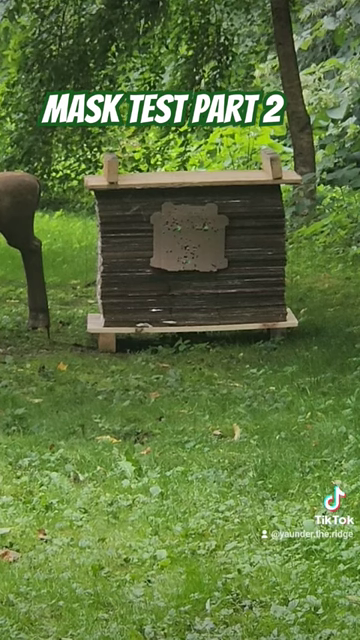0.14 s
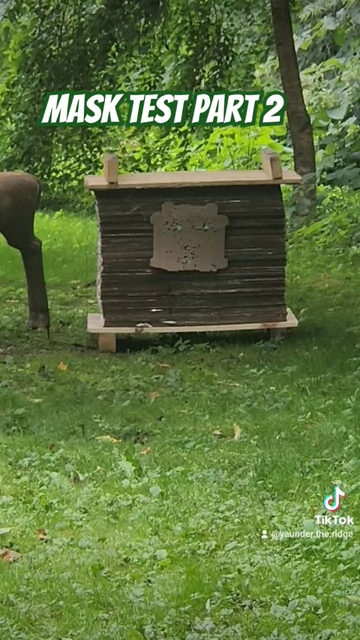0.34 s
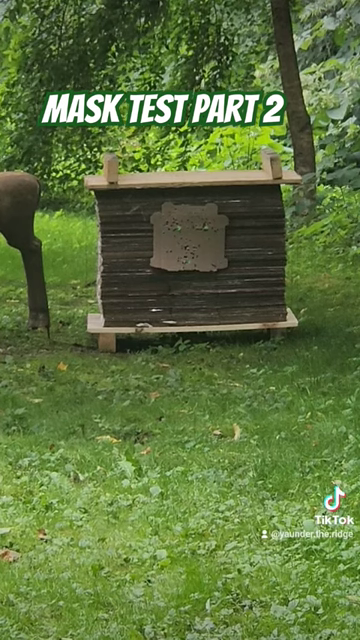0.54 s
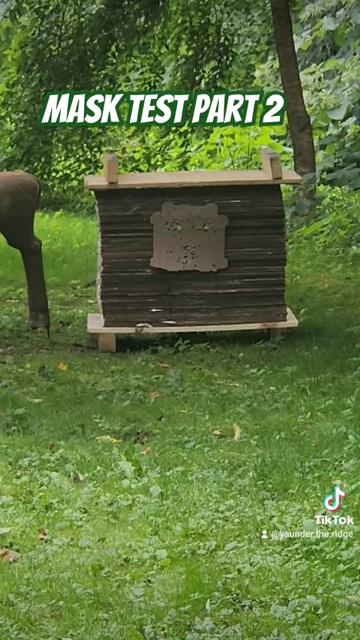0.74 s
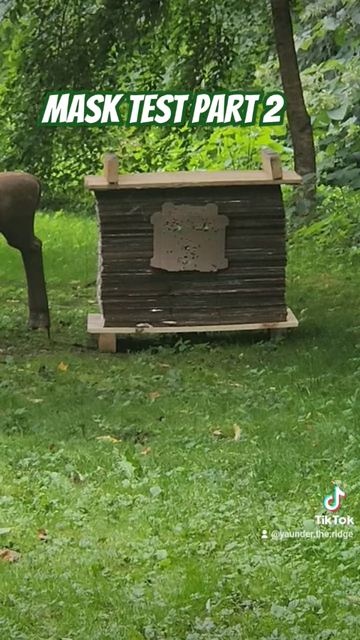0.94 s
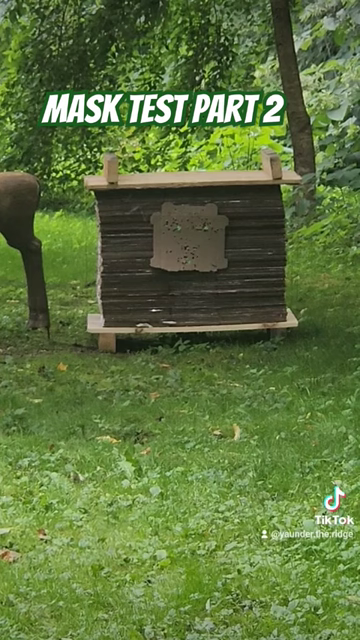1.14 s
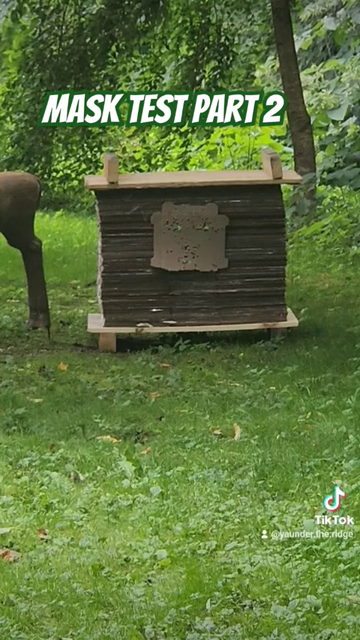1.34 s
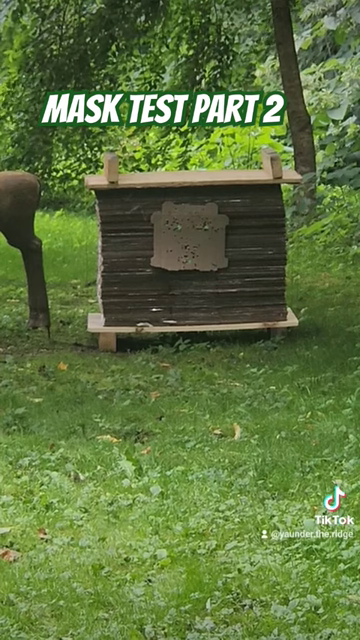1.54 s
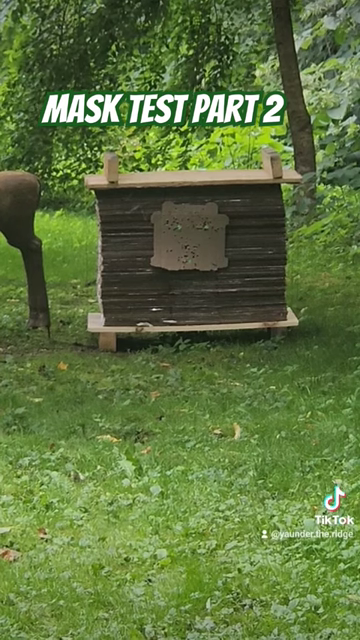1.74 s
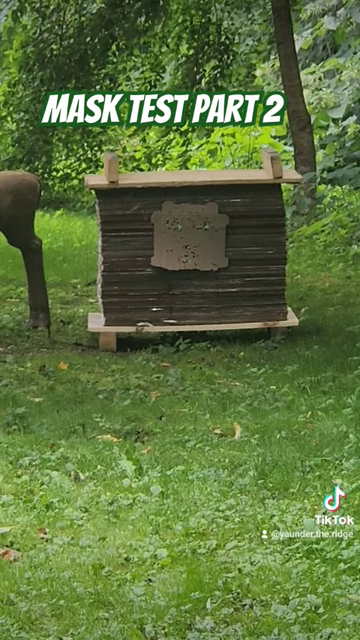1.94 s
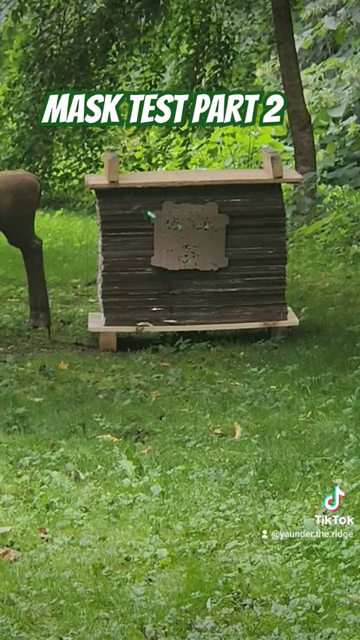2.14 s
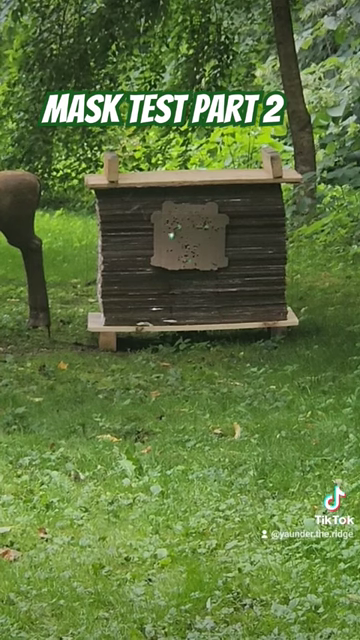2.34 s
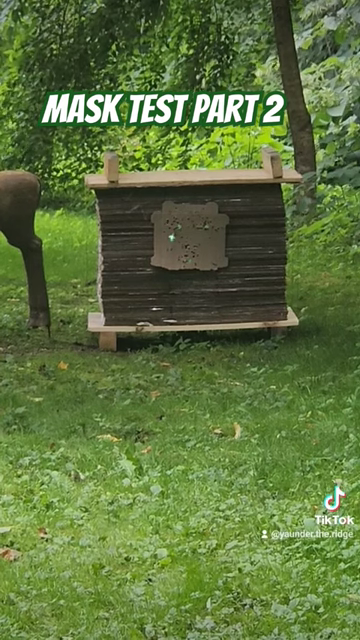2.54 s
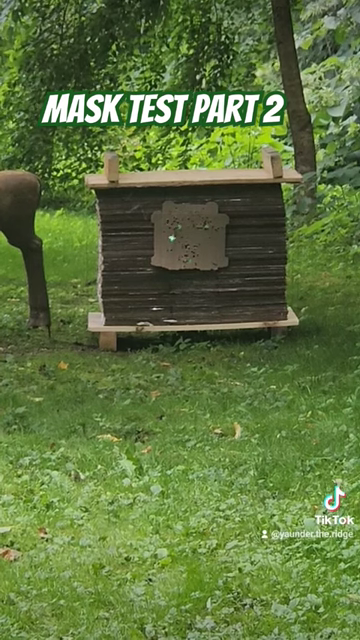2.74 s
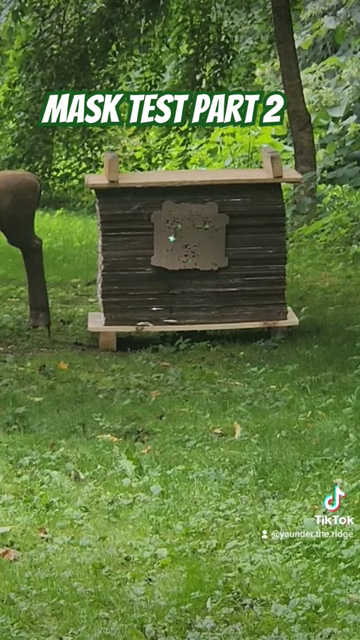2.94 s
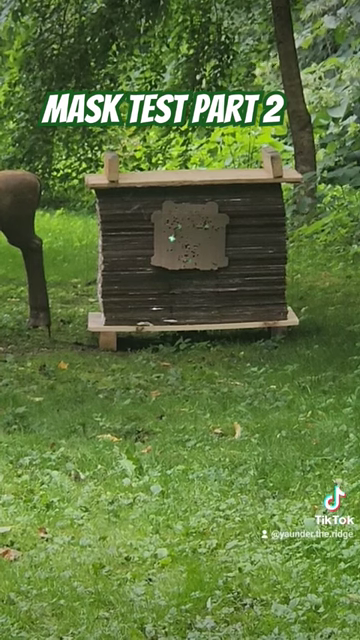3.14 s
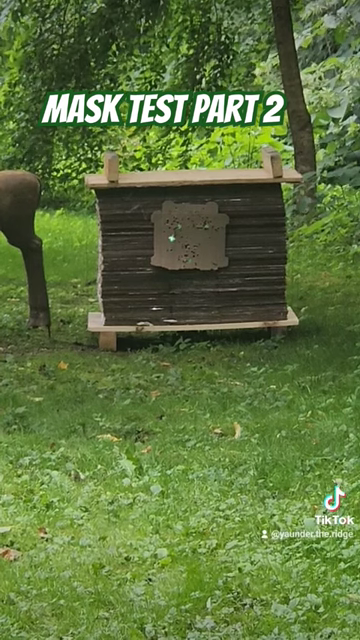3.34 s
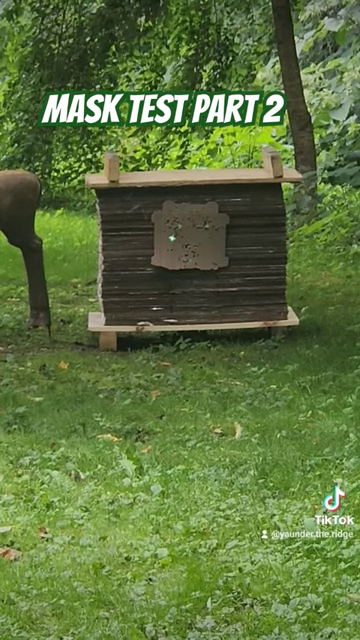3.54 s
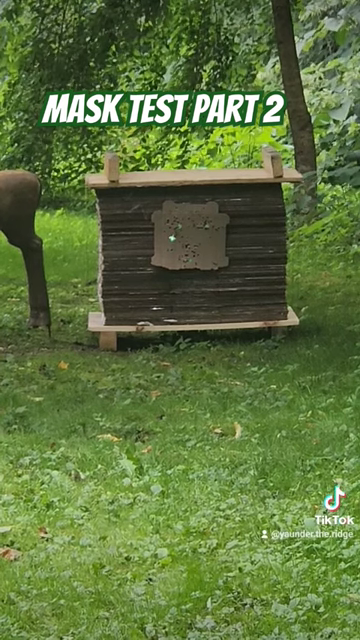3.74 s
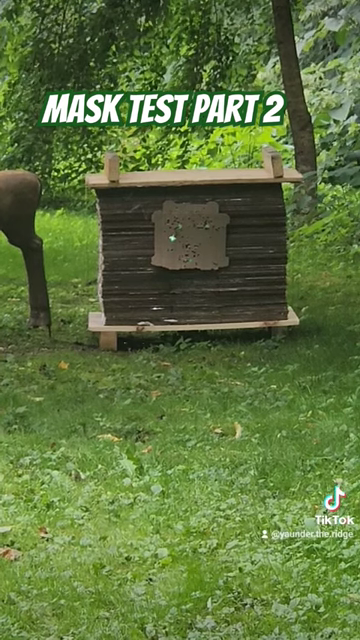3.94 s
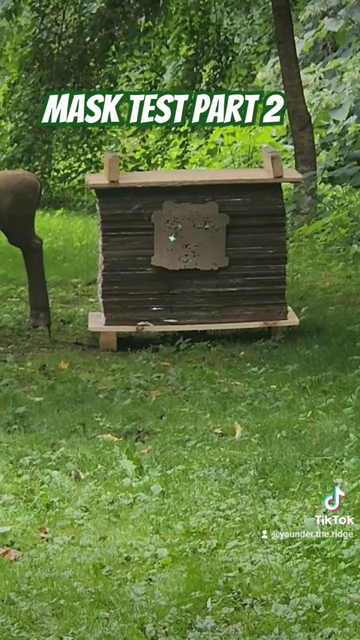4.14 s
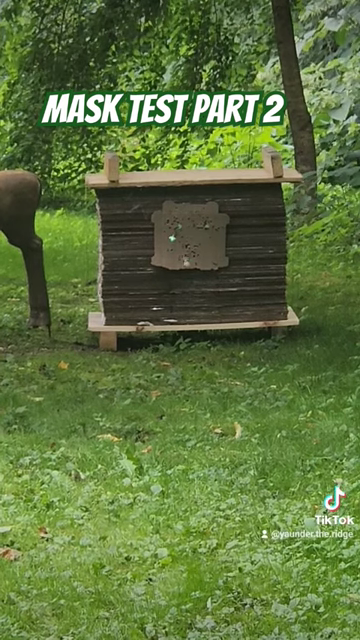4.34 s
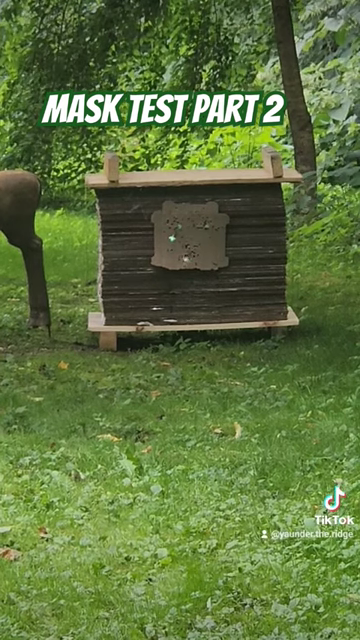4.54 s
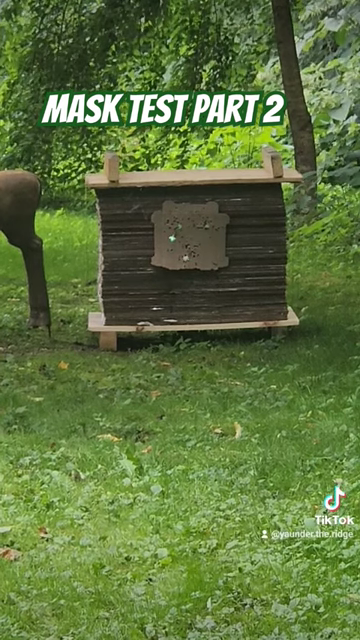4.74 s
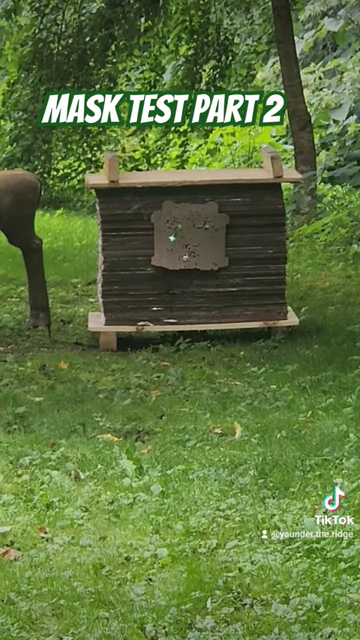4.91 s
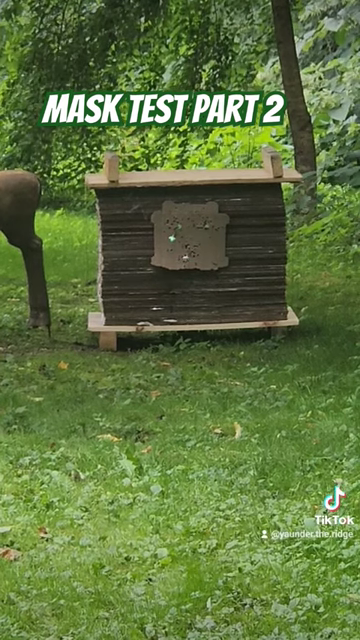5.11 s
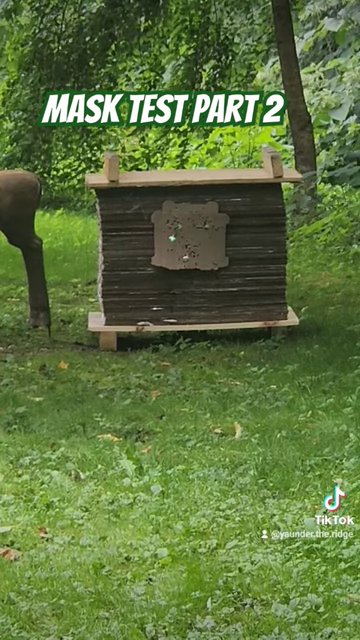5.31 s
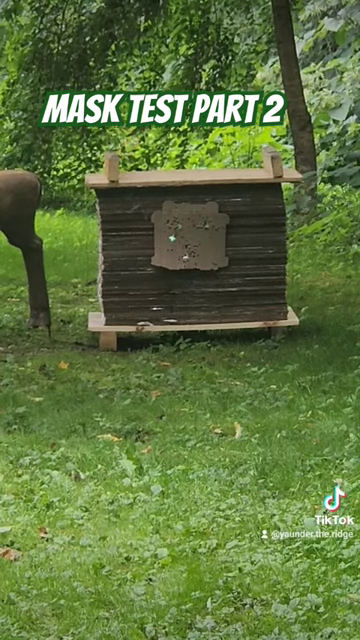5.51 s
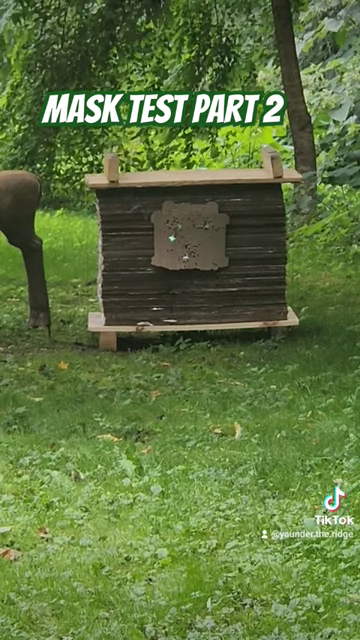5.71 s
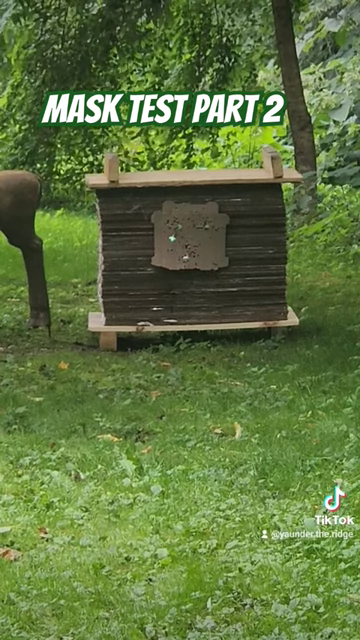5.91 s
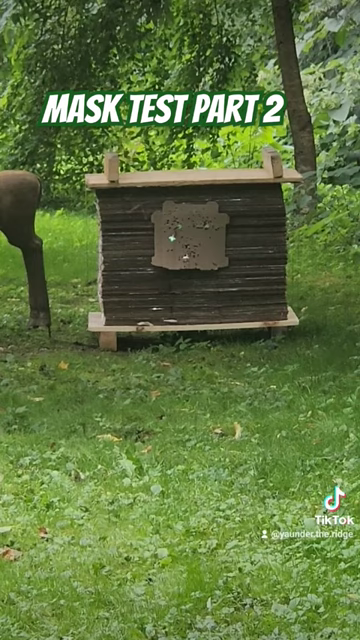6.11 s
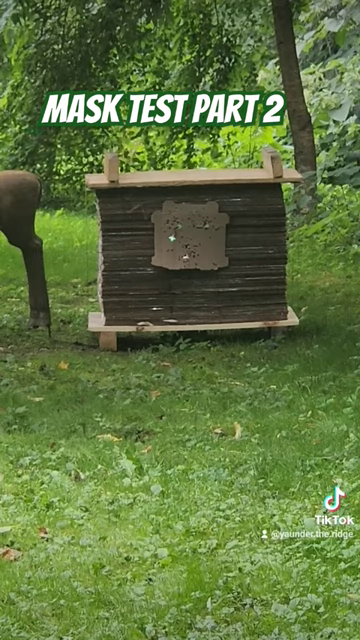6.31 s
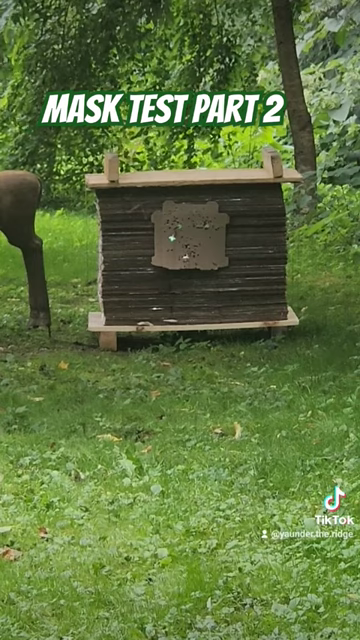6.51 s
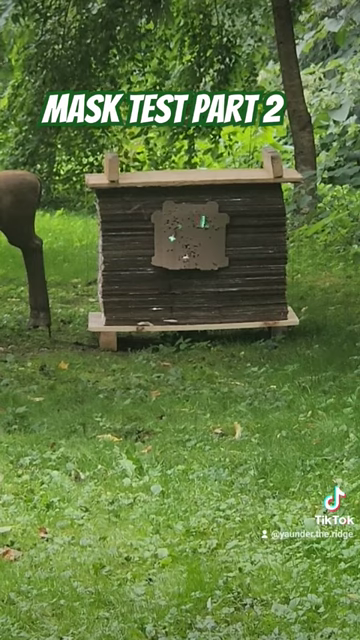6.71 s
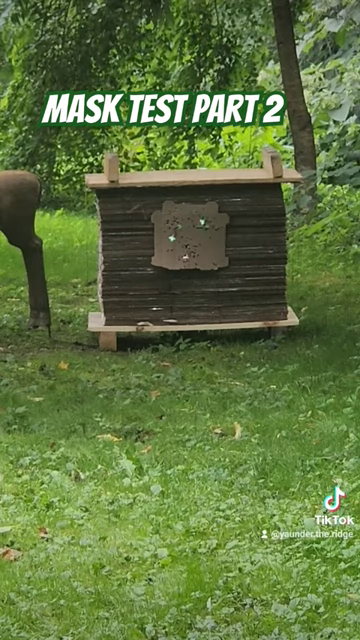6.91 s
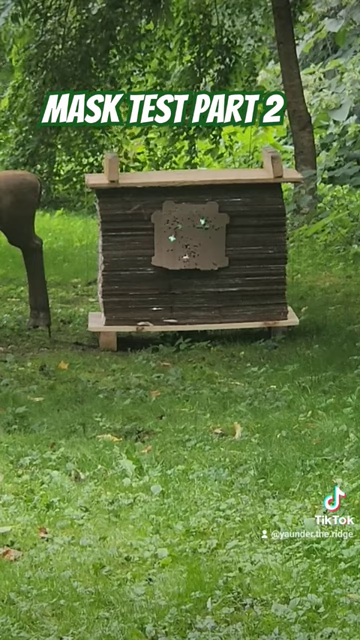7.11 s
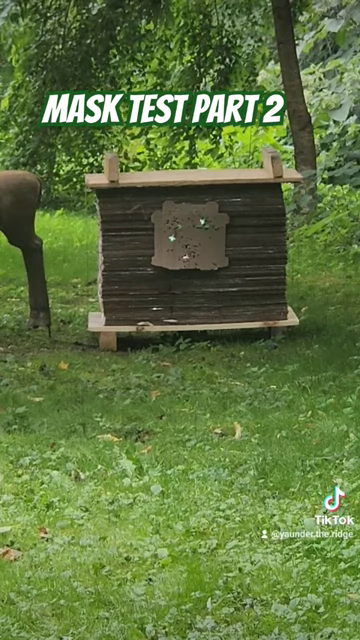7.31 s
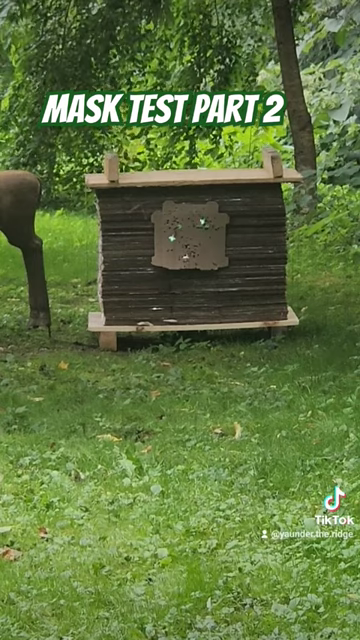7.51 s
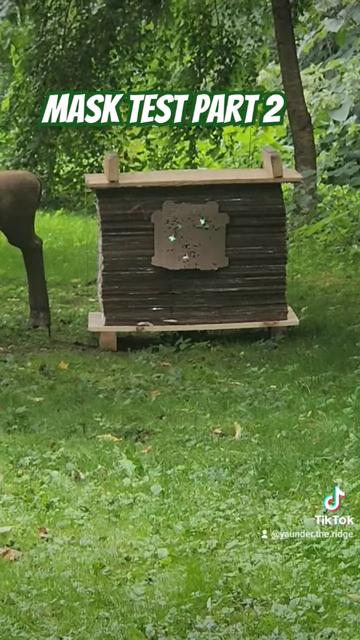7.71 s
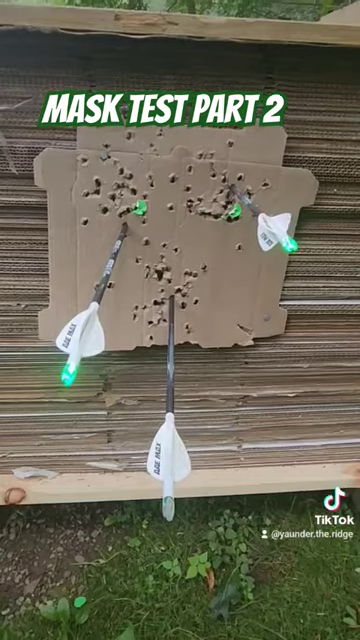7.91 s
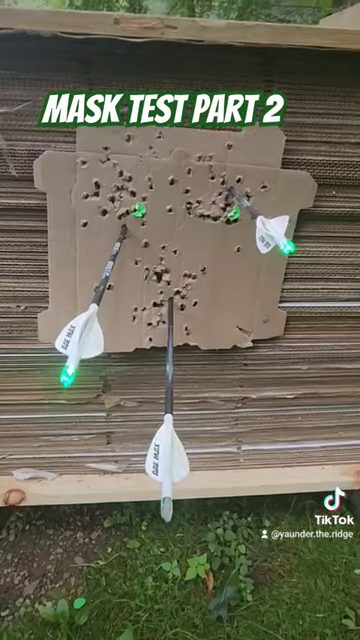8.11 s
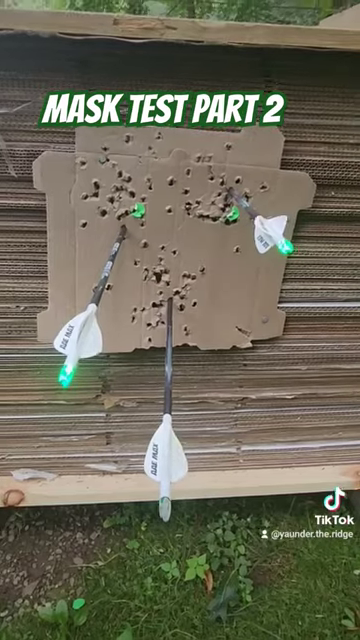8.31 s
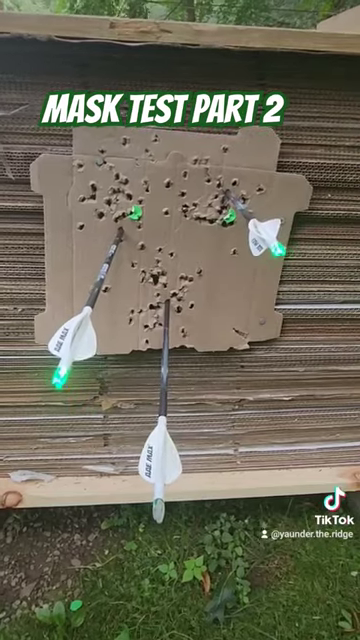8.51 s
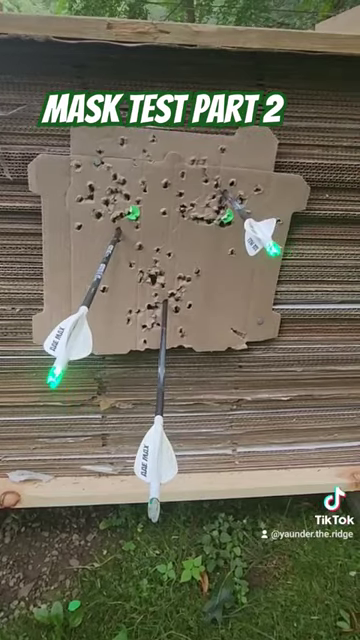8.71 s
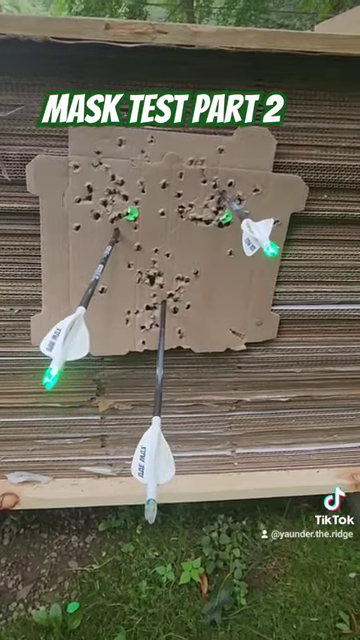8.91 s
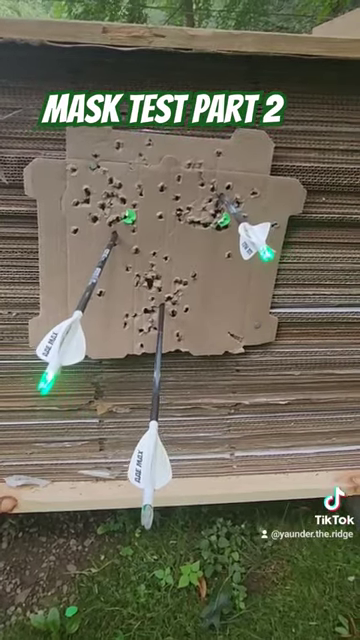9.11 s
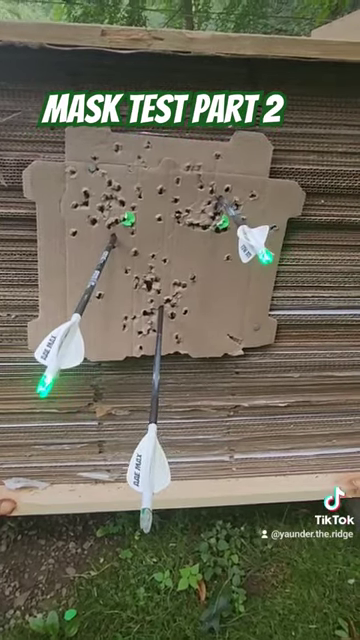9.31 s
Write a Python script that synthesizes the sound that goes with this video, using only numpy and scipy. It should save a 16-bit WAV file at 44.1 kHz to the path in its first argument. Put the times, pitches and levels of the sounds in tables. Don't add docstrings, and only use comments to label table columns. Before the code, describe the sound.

In a leafy yard, a phone close to a compound bow catches three loud shots: a tiny click, string rush, hard snap and short ringing rattle. About 0.3 seconds after each, an arrow cracks and thuds into a distant cardboard block. Low machinery rumble and leaf hiss continue, with abrupt cuts between shots. After a brief silence, the sound is quieter beside the target, with soft clothing rustles.

```python
import sys
import numpy as np
from scipy import signal
from scipy.fft import rfft, irfft, next_fast_len
from scipy.io import wavfile
from scipy.ndimage import uniform_filter1d

SR = 44100
rng = np.random.default_rng(int(sys.argv[2]) if len(sys.argv) > 2 else 0)


def amplitude_ratio(level_db):
    exponent = np.asarray(level_db, float) / 20
    return 10 ** exponent


def int16_out(signal):
    q = np.round(np.clip(np.atleast_2d(signal).T, -1, 1) * 32767)
    wavfile.write(sys.argv[1], SR, q.astype(np.int16))


N = 412423
STEP = 64

# time in seconds, strength in dB.
SHOTS = [
    (2.3364, -2.5),
    (4.2713, -2),
    (6.6770, -1.5),
]
# frequency in Hz, peak in dB,
# first swell in ms, swell length in ms, loss per swing in dB.
RING_MODES = [(517, -9, 22, 23, 9.5), (575, -14, 8.5, 13, 7), (712, -13.5, 15.5, 14, 5.5),
              (760, -14.5, 29, 11, 6.5), (510, -21, 0, 12, 12), (130, -21, 22, 34, 4), (290, -18, 5, 13, 9),
              (390, -22, 20, 22, 5), (850, -22, 16, 12, 4), (1020, -23, -1, 14, 12), (1180, -25, 22, 14, 9),
              (1450, -22, 0, 13, 12), (1500, -26, 13, 14, 5), (1880, -24, 15, 17, 7)]
# frequency in Hz, density in dB per Hz.
RUSH_COLOUR = [(530, -33), (900, -8.5), (1470, -6), (1680, -14), (2040, -6), (2360, -19), (3000, -8.5),
               (7860, -22.5), (9200, -23), (14700, -19.5), (16000, -35.5)]
# frequency in Hz, left minus right in dB.
RUSH_PAN = [(60, 1.0), (110, 1.0), (200, 0.5), (380, 2.0), (700, 3.5), (1290, 1), (2380, 13), (4400, 0),
            (8120, 1.5), (15000, 4.5)]
# time after the stop in ms, level in dB, frequency in Hz,
# width in Hz, decay t60 in ms. First, the release jaw opens.
RELEASE = [
    (-23.5, -14, 17000, 2600, 11),
    (-23, -16.5, 14600, 3000, 11),
    (-27.5, -29, 5500, 4000, 28),
]
NOCK = [
    (-10, -23.5, 13000, 2500, 40),
    (-6.5, -7, 14700, 1800, 10),
    (-4, -20.5, 1900, 1700, 28),
]
STOP = [
    (-1.8, -9.5, 13500, 5000, 14),
    (-2, -4, 5000, 660, 10),
    (0.93, -21.5, 4700, 2200, 89),
    (-1.1, -4.5, 6100, 2600, 13),
    (-2, -18, 3400, 1800, 30),
]
ECHO = [
    (52, -14, 2600, 4500, 7.8),
    (50, -20, 15000, 5000, 11),
]
RISER = [
    (-2.5, -18, 496, 520, 300),
    (2, -21.5, 1300, 1300, 200),
]
# frequency in Hz, left minus right in dB.
CLICK_PAN = [(600, 3), (2400, 5.5), (3500, 5), (5200, -9.5), (7300, 6), (14600, 11)]

# time in seconds, crack in dB, crack frequency in Hz, tear t60 in ms, scatter in dB.
STRIKES = [
    (2.6272, -14.5, 3600, 7, -25.5),
    (4.5656, -12, 2950, 7, -26.5),
    (6.9711, -15, 2720, 15, -29.5),
]
# level in dB, frequency in Hz, width in Hz, t60 in ms,
# left minus right in dB.
SHAFTS = [
    (-32.5, 4130, 330, 450, 4),
    (-33, 5100, 1600, 160, -4),
    (-33, 2800, 900, 150, 4),
]
# frequency ratio, level in dB.
TICK_OVERTONES = [(1, 0), (1.8, -2), (2.5, -7)]
# frequency in Hz, level in dB, t60 in seconds.
BLOCK_MODES = [(170, -14, 0.034), (235, -4, 0.1), (326, -7, 0.11), (502, 0, 0.018), (636, -23.5, 0.049),
               (1003, -5, 0.033)]
# frequency in Hz, density in dB per Hz.
SCATTER_COLOUR = [(880, -35), (1500, -9.5), (3620, -5.5), (4200, -25), (4550, -4), (7610, -12),
                  (9010, -40.5), (9850, -16.5), (12700, -13.5), (15200, -19.5), (16000, -26.5)]
# frequency in Hz, left minus right in dB.
SCATTER_PAN = [(60, 1.5), (110, 2.0), (200, 1.5), (380, 1.5), (700, 2.0), (1290, -6.5), (2380, 6),
               (4400, -6), (8120, 3.5), (15000, 5.5)]

# time in seconds, level in dB, rub frequency in Hz, t60 in ms, crisp edge in dB.
RUSTLES = [
    (8.433, -47, 6000, 120, -47),
    (8.49, -60, 6000, 80, -58),
    (8.985, -47, 4300, 100, -64),
    (9.042, -51, 4300, 190, -54),
]

# frequency in Hz, density in dB per Hz.
YARD_COLOUR = [(13, -38), (22, -12.5), (109, -0.5), (165, -2.5), (257, -15), (485, -27), (695, -27),
               (798, -28), (968, -27), (1470, -28), (3090, -32.5), (5520, -41), (8580, -53), (14900, -55),
               (16200, -69.5)]
# frequency in Hz, likeness from -1 to 1.
YARD_ALIKE = [(60, 0.97), (130, 1), (290, 0.98), (640, 0.91), (1410, 0.42), (3100, 0.22), (6820, -0.029),
              (15000, 0.16)]
# frequency in Hz, left minus right in dB.
YARD_PAN = [(60, 2), (110, 1.5), (200, 1), (380, 2), (700, 3), (1290, 1), (2380, 5), (4400, -3),
            (8120, -1.5), (15000, 11.5)]
# frequency in Hz, density in dB per Hz.
CLOSE_COLOUR = [(13, -44), (22, -21.5), (74, -12.5), (119, -14), (152, -32.5), (237, -20.5), (447, -37.5),
                (798, -35), (867, -36), (942, -41), (2770, -42), (5990, -43.5), (11300, -53),
                (14500, -58.5), (16200, -61)]
# frequency in Hz, likeness from -1 to 1.
CLOSE_ALIKE = [(60, 0.99), (130, 1), (290, 0.93), (640, 0.6), (1410, -0.15), (3100, 0.059), (6820, 0.026),
               (15000, 0.12)]
# frequency in Hz, left minus right in dB.
CLOSE_PAN = [(60, 0), (110, 1.5), (200, -1.5), (380, 1.5), (700, 3), (1290, -2), (2380, 0.5), (4400, 4),
             (8120, -0.5), (15000, 11)]
# frequency in Hz, width in Hz, boost in dB.
DRONES = [(33, 6.4, 10), (66.8, 11, 10.5), (112.4, 12, 7.5), (155.6, 9.1, 6), (691, 25, 7), (1450, 43, 1.5)]
# time in seconds, rumble in dB.
RUMBLE_LEVEL = [
    [(0.0, -33), (1.11, -29.5), (1.35, -34), (2.17, -31), (4.27, -31), (5.17, -34.5), (5.75, -31),
     (6.95, -31.5), (7.7, -33)],
    [(8.25, -51), (8.292, -51.5), (8.424, -44.5), (8.592, -42.5), (9.022, -44), (9.35, -41.5)],
]
# lower edge in Hz, upper edge in Hz.
ZONE_HZ = [
    (25, 200),
    (200, 500),
    (500, 3000),
    (3000, 16000),
]
# hum in dB, traffic in dB, leaves in dB.
PIECES = [
    (-41, -44, -53),
    (-42, -43, -52.5),
    (-40, -43.5, -50),
    (-50.5, -51, -59.5),
]
# frequency in Hz, lift in dB.
BREEZE = [(5000, 0.5), (9000, -0.5), (15000, 2)]
# frequency in Hz, depth in dB.
FLUTTER = [(300, 0.5), (1000, 4.5), (6000, 5.5), (9000, 0.5), (11500, 8.5), (14000, 1)]

# sound out in seconds, sound in in seconds, fade-in in seconds.
CHANGES = [
    (3.6365, 3.637, .012),
    (5.7175, 5.719, .014),
    (7.950, 8.106, .014),
]
# frequency in Hz, share from 0 to 1.
DROPOUTS = [(2500, 0), (8200, .03), (8900, .5), (11000, .45), (11600, .09), (15500, .06)]
# frequency in Hz, gain in dB.
PORT = [(6500, 0), (8200, 3), (8900, -3), (9500, 0), (10800, -0.5), (11600, -2), (14000, -2), (15500, 3),
        (15800, -23), (16500, -34.5)]
# frequency in Hz, gain in dB.
SHADE = [(8000, 0), (8800, -48.5), (10600, -30), (11500, 0)]


def on_log(hz, table):
    f, v = np.transpose(table)
    return np.interp(np.log(np.maximum(hz, 1)), np.log(f), v)


def unit(x):
    return x / np.sqrt(np.mean(x ** 2))


def pan_gain(pan_db):
    return amplitude_ratio(np.array([pan_db / 2, -pan_db / 2]))


def add(out, s, sound):
    i = int(round(s * SR))
    out[:, i:i + sound.shape[-1]] += sound[..., :N - i]


def coloured(size, colour, pan, lo=0, hi=SR):
    hz = np.fft.rfftfreq(size, 1 / SR)
    gain = unit(amplitude_ratio(on_log(hz, colour)) * (hz > lo) * (hz <= hi))
    return irfft(rfft(rng.standard_normal((2, size))) * gain * pan_gain(on_log(hz, pan)), size)


def burst(db, hz, width, t60_ms, pan_db, rise_ms=0.27):
    ms = np.arange(min(int(t60_ms * SR / 1000), SR // 2)) / SR * 1000
    noise = rng.standard_normal((2, len(ms)))
    if hz <= 900:
        noise = noise[[0, 0]]
    peak = signal.iirpeak(hz, hz / width, SR)
    band = signal.lfilter(*peak, signal.lfilter(*peak, noise))
    envelope = (1 - np.exp(-ms / rise_ms)) * amplitude_ratio(-60 * ms / t60_ms)
    size = np.linalg.norm(envelope) / np.linalg.norm(band * envelope, axis=1, keepdims=True)
    return size * band * envelope * amplitude_ratio(db) * pan_gain(pan_db)[:, None]


def walk(rate, size):
    hold = int(SR / STEP / rate)
    held = np.repeat(rng.standard_normal(size // hold + 1), hold)
    return 1.45 * uniform_filter1d(uniform_filter1d(held, hold), hold)[:size]


def limb_ring(ms):
    swings, swing_ms, damper_ms = 3, 29, 32
    ring = np.zeros(len(ms))
    for hz, db, first, length, loss_db in RING_MODES:
        for k in range(swings):
            late = ms - first - k * swing_ms
            swell = np.cos(np.pi * np.clip(late / length, -.5, .5))
            if k == 0:
                swell = swell * np.clip((damper_ms - ms) / 1.9, .1, 1)
            ring += amplitude_ratio(db - k * loss_db) * swell * np.cos(2 * np.pi * hz * late / 1000)
    return ring


def string_whistle(ms):
    from_ms, length_ms, low_hz, high_hz = -12, 12, 1200, 3300
    flight = np.clip((ms - from_ms) / length_ms, 0, 1)
    glide_hz = low_hz + flight * (high_hz - low_hz)
    return amplitude_ratio(-32) * np.sin(np.pi * flight) * np.sin(2 * np.pi * np.cumsum(glide_hz) / SR)


def rush_level(ms, rush_db, rattle_db, sag_db, fall_db_per_ms, after_db_per_ms):
    hold_ms, fall_ms = 58, 32
    fallen_ms = hold_ms + fall_ms
    held_db = rattle_db - sag_db
    fallen_db = held_db - fall_ms * fall_db_per_ms
    end_db = fallen_db - (ms[-1] - fallen_ms) * after_db_per_ms
    when = [-28, -26, 5.5, 9.3, hold_ms, fallen_ms, ms[-1]]
    level = [rush_db - 24, rush_db, rush_db, rattle_db, held_db, fallen_db, end_db]
    return np.interp(ms, when, level)


def cable_rush(ms, split_hz=4000):
    low = coloured(len(ms), RUSH_COLOUR, RUSH_PAN, 900, split_hz)
    high = coloured(len(ms), RUSH_COLOUR, RUSH_PAN, split_hz)
    low = low * amplitude_ratio(rush_level(ms, -37, -25.5, 0, .6, .2))
    high = high * amplitude_ratio(rush_level(ms, -34.5, -25.5, 6, .45, .1))
    hold = int(1.6 * SR / 1000)
    grains = np.repeat(rng.standard_normal(len(ms) // hold + 1), hold)
    grit = amplitude_ratio(4.5 * uniform_filter1d(grains, hold // 2)[:len(ms)])
    return low * unit(grit) + high * unit(np.sqrt(grit))


def bow_clicks(out, s, db):
    slaps = [((k + 1) * 9.9, -12 - k * 1.4, 2400, 2200, 8.9) for k in range(6)]
    for at_ms, click_db, hz, width, t60_ms in RELEASE + NOCK + STOP + slaps + ECHO + RISER:
        click = burst(click_db, hz, width, t60_ms, on_log(hz, CLICK_PAN), rise_ms=0.76)
        add(out, s + at_ms / 1000, amplitude_ratio(db + rng.standard_normal()) * click)


def bow(out):
    ms = np.arange(-1600, 9000) / SR * 1000
    ring = (limb_ring(ms) + string_whistle(ms)) * pan_gain(3.5)[:, None]
    for s, db in SHOTS:
        add(out, s + ms[0] / 1000, amplitude_ratio(db) * (ring + cable_rush(ms)))
        bow_clicks(out, s, db)


def point_crack(out, t, s, db, hz, t60_ms):
    add(out, s, burst(db, hz, 17 * 1000 / t60_ms, t60_ms, 3.9, rise_ms=0.068))
    tick = amplitude_ratio(db + 6 - 60000 * t / (.37 * t60_ms)) * (1 - np.exp(-1000 * t / .12))
    tick = tick * sum(amplitude_ratio(d) * np.sin(2 * np.pi * ratio * hz * t) for ratio, d in TICK_OVERTONES)
    add(out, s + .5 / 1000, tick * pan_gain(6.8)[:, None])
    add(out, s, burst(db - 4, 1.9 * hz, 2400, t60_ms, 13.0, rise_ms=0.078))
    add(out, s, burst(-18.5, 14000, 4400, 1.5 * t60_ms, 9, rise_ms=0.49))


def block_thud(out, t, s, thud_db=-19):
    add(out, s, burst(thud_db - 5.5, 460, 790, 65, 1.5, rise_ms=.3))
    thud = sum(-amplitude_ratio(d - 60 * t / t60) * np.sin(2 * np.pi * f * t) for f, d, t60 in BLOCK_MODES)
    add(out, s, amplitude_ratio(thud_db) * thud * (1 - np.exp(-t / 0.00041)) * pan_gain(1.5)[:, None])


def vane_hiss(out, t, s):
    swell = amplitude_ratio(-33 - 60 * t[::-1] / 0.067)
    add(out, s - len(t) / SR, swell * coloured(len(t), SCATTER_COLOUR, SCATTER_PAN, 1500))


def tree_scatter(out, t, s, tail_db):
    fade = amplitude_ratio(-60 * t / 0.14) + amplitude_ratio(-16.5 - 60 * t / 0.91)
    fade = fade * (1 - np.exp(-t / 0.0014))
    add(out, s, amplitude_ratio(tail_db) * fade * coloured(len(t), SCATTER_COLOUR, SCATTER_PAN, 1200))


def target(out):
    t = np.arange(16384) / SR
    for (s, db, hz, t60_ms, tail_db), shaft in zip(STRIKES, SHAFTS):
        point_crack(out, t, s, db, hz, t60_ms)
        block_thud(out, t, s)
        add(out, s, burst(*shaft, rise_ms=2.6))
        vane_hiss(out, t, s)
        tree_scatter(out, t, s, tail_db)


def cloth(out):
    for s, db, hz, t60_ms, crisp_db in RUSTLES:
        add(out, s, burst(db, hz, 2200, t60_ms, 2.2, rise_ms=3))
        add(out, s, burst(crisp_db, 14800, 1930, t60_ms, 10.5, rise_ms=3))


def zone_levels(t, moved, hz, far, close):
    piece = np.searchsorted([start for _, start, _ in CHANGES], t)
    rumble_db = np.interp(t, *np.transpose(RUMBLE_LEVEL[0] + RUMBLE_LEVEL[1]))
    zones = [rumble_db, *np.array(PIECES)[piece].T]
    levels = []
    for zone, (lo, hi), wander_db in zip(zones, ZONE_HZ, (.8, .8, .6, .7)):
        inside = (hz > lo) & (hz <= hi)
        far_db, close_db = (-10 * np.log10(np.sum(g[inside] ** 2) / len(hz)) for g in (far, close))
        levels.append(zone + np.where(moved, close_db, far_db) + wander_db * walk(4, len(t)))
    return np.array(levels)


def yard(flicker_db=0.88):
    size, t = next_fast_len(N), np.arange(0, N, STEP) / SR
    hz = np.fft.rfftfreq(size, 1 / SR)
    drones_db = sum(db / (1 + (2 * (hz - f) / w) ** 2) for f, w, db in DRONES)
    far = amplitude_ratio(on_log(hz, YARD_COLOUR) + drones_db)
    close = amplitude_ratio(on_log(hz, CLOSE_COLOUR))
    moved = t > CHANGES[-1][0] + .05
    breezy = (t > CHANGES[1][0]) & ~moved
    zone_db = zone_levels(t, moved, hz, far, close)
    a, b = rfft(rng.standard_normal((2, size))) * far
    octave, out = np.log2(np.maximum(hz, 1) / 20), 0
    for k in np.arange(0, 10, .5):
        centre = 20 * 2 ** k
        slot = np.cos(np.pi * np.clip(octave - k, -.5, .5))
        mid, side = irfft(a * slot, size)[:N], irfft(b * slot, size)[:N]
        share = [on_log(centre, list(zip([130, 300, 1000, 5000], one))) for one in np.eye(4)]
        db = share @ zone_db + flicker_db * walk(9, len(t))
        db = db + moved * (on_log(centre, CLOSE_COLOUR) - on_log(centre, YARD_COLOUR))
        db = db + breezy * on_log(centre, BREEZE)
        alike = np.where(moved, on_log(centre, CLOSE_ALIKE), on_log(centre, YARD_ALIKE))
        alike = np.clip(alike, -.3, .995)
        side = side * np.repeat(np.sqrt((1 - alike) / (1 + alike)), STEP)[:N]
        pan = pan_gain(np.where(moved, on_log(centre, CLOSE_PAN), on_log(centre, YARD_PAN)))
        gain = np.repeat(amplitude_ratio(db) * pan, STEP, axis=1)[:, :N]
        out = out + gain * np.array([mid + side, mid - side])
    return out


def flutter(x):
    hz, _, cells = signal.stft(x, SR, "hann", nperseg=1024)
    depth_db = on_log(hz, FLUTTER)[:, None]
    patch = unit(uniform_filter1d(rng.standard_normal(cells.shape), size=2))
    mean_db = depth_db ** 2 * np.log(10) / 20
    return signal.istft(cells * amplitude_ratio(depth_db * patch - mean_db), SR, "hann", nperseg=1024)[1][:, :N]


def scene():
    out = flutter(yard())
    bow(out)
    target(out)
    cloth(out)
    return out


def treble_dropouts(x):
    hz, t, cells = signal.stft(x, SR, "hann", nperseg=2048)
    chance = rng.random((2, 65, cells.shape[2] // 2 + 1))
    chance = np.repeat(np.repeat(chance, 16, axis=1), 2, axis=2)
    chance = chance[:, :len(hz), :cells.shape[2]]
    share = on_log(hz, DROPOUTS)[:, None] * np.where(t > CHANGES[1][0], .5, 1)
    return signal.istft(cells * (chance > share), SR, "hann", nperseg=2048)[1][:, :N]


def low_pass(x):
    return signal.sosfilt(signal.butter(12, 16660, fs=SR, output="sos"), x)


def record(dry):
    t, size = np.arange(N) / SR, next_fast_len(N)
    hz = np.fft.rfftfreq(size, 1 / SR)
    x = treble_dropouts(np.tanh(0.59 * dry) / 0.62)
    for stop, start, fade in CHANGES:
        x = x * np.where(t < stop, 1, np.clip((t - start) / fade, 0, 1))
    ports_db = on_log(hz, PORT) + np.array([0 * hz, on_log(hz, SHADE)])
    x = irfft(rfft(x, size) * amplitude_ratio(ports_db) * (hz < 16600), size)[:, :N]
    return low_pass(np.clip(x, -.84, .84))


dry = scene()
out = record(dry)
int16_out(out)
```